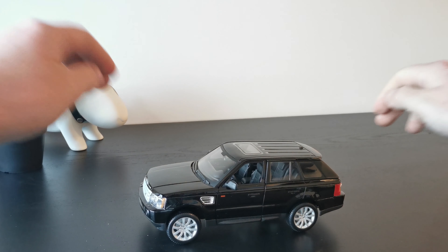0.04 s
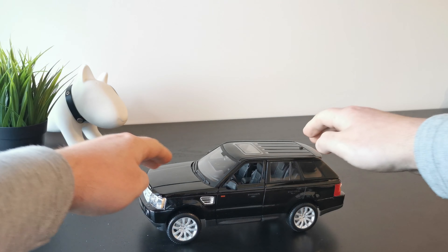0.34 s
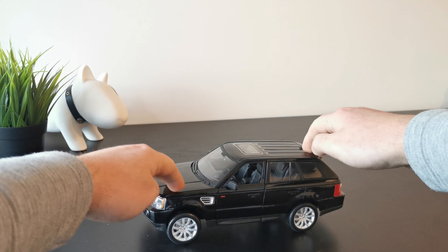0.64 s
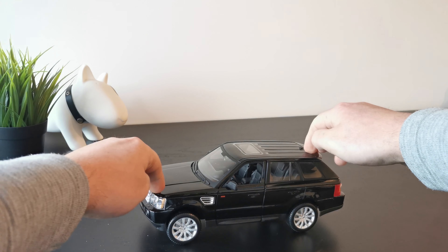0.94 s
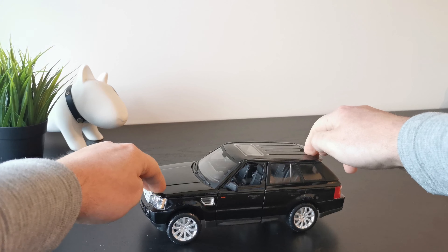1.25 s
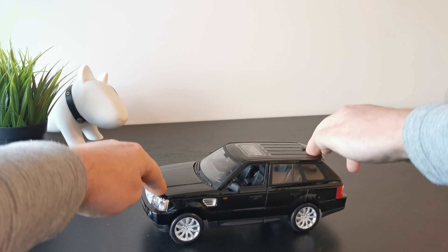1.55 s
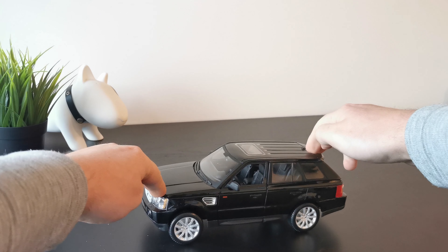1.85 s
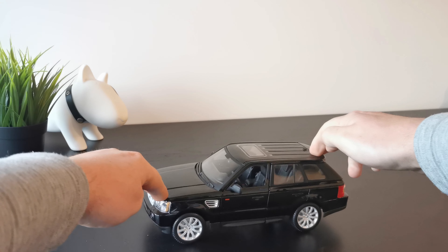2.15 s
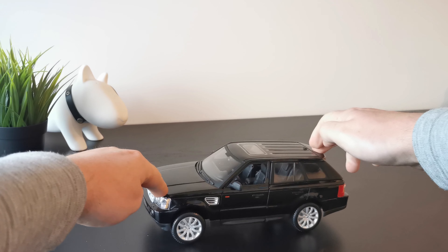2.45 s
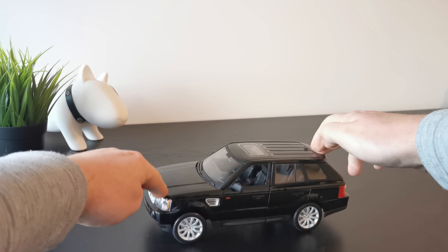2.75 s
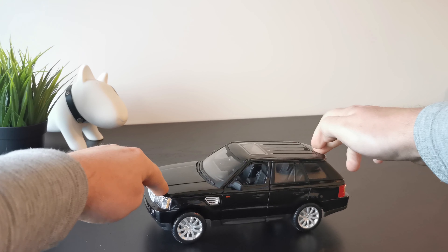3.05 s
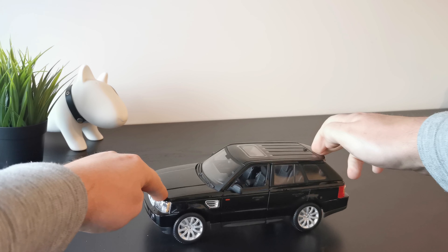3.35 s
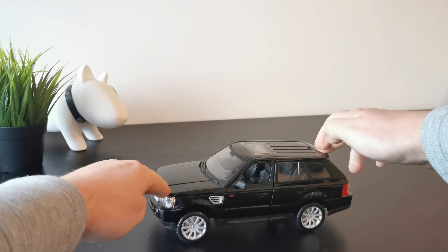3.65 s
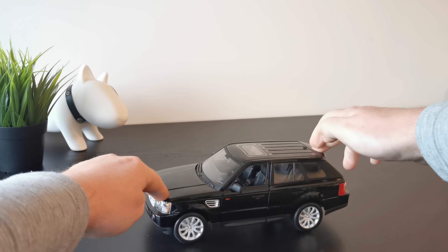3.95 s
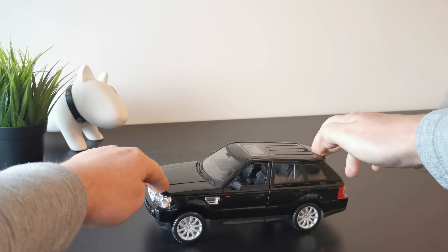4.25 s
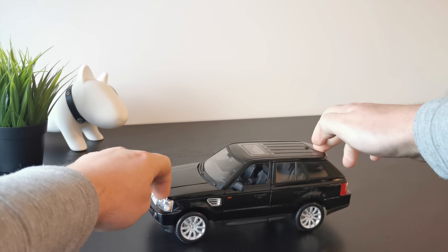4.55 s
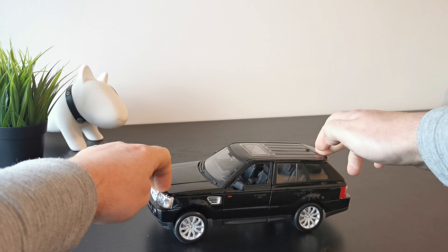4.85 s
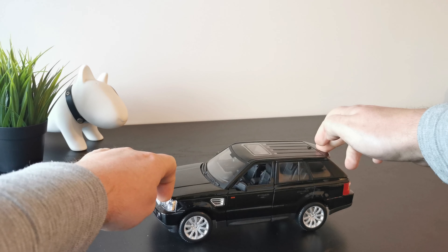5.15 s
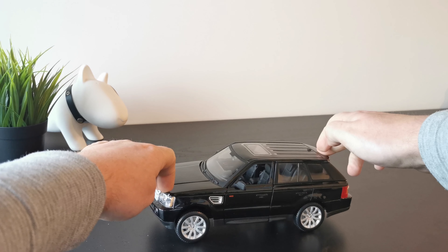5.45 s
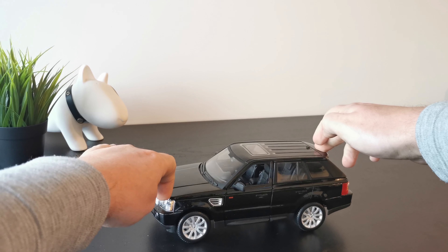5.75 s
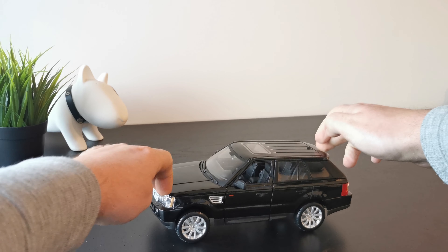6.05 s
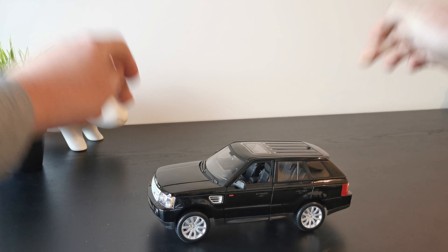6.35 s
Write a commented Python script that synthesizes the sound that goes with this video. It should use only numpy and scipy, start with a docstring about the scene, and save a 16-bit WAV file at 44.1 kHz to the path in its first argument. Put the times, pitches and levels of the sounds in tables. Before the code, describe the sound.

Two fingers rock a small metal model car on a table. After a few faint ticks, it is pushed down and let back up about eight times in a steady rhythm. Each stroke gives a light, rattly knock and a very short plastic squeak, with tiny spring ticks between. Sleeves rustle faintly as the hands leave. The sound is close, in a small, bare, quiet room.

```python
"""A die-cast model car knocks on its suspension stops as two fingers rock it on a table.
Each impact, on press and on release, excites the damped modes of the car, its shell and the table.
Stick-slip friction draws short, squeaky scrapes from the plastic struts, and the small springs tick.
Sleeves rustle as the hands come and go, the table trembles, and a small, bare room reverberates."""
import sys
import numpy as np
from scipy import signal
from scipy.fft import rfft, irfft, next_fast_len
from scipy.io import wavfile
from scipy.ndimage import uniform_filter1d

SR = 44100
rng = np.random.default_rng(int(sys.argv[2]) if len(sys.argv) > 2 else 0)


def wrap_up_sound(samples):
    """Save the sound to the file named by the first command line argument, as 16-bit audio."""
    columns = np.atleast_2d(samples).T
    # keep every value between -1 and 1, then stretch to whole-number steps
    tamed = np.clip(columns, -1, 1)
    steps = np.round(tamed * 32767).astype(np.int16)
    wavfile.write(sys.argv[1], SR, steps)


N = 290683
T = np.arange(SR // 2) / SR  # time since a contact [s]

# Levels in the tables are relative; each source applies its own gain.
# sleeve swishes: (peak time [s], level [dB], rise constant [s], fall constant [s])
SWISHES = [(.3, -80, .15, .15), (.55, -80.5, 0.12, 0.045), (3.41, -60.5, 0.074, 0.049),
           (4.56, -65.5, 0.14, .06), (5.13, -65.5, 0.025, 0.064), (6.2, -77, 0.6, 0.22),
           (6.59, -59.5, 0.23, .1)]
# spectra of cloth, table tremor and room air: (frequency [Hz], level [dB])
CLOTH_SPECTRUM = [(300, 0.5), (1000, -12.5), (2000, -7), (3300, -5), (4500, -6), (6000, -11), (8000, -15.5),
                  (11000, -20), (15500, -33)]
TREMOR_SPECTRUM = [(12, -20.5), (27, 13), (45, -26), (62, 2), (85, -6), (130, -20), (300, -9.5), (900, -65)]
AIR_SPECTRUM = [(12, -41), (20, 4.5), (85, -2), (137, -7.5), (232, -2.5), (439, -18), (614, -16),
                (932, -18.5), (1130, -27.5), (1500, -25.5), (3000, -29), (6020, -41.5), (15500, -40.5)]
# a fingertip lands, a spring or wheel settles: (time [s], level [dB], pitch [Hz], click [dB])
TICKS = [(1.133, -62.5, 2410, -72.5), (1.349, -59, 1145, -70), (1.371, -53.5, 1840, -64),
         (1.688, -46, 2260, -85), (1.858, -55.5, 2040, -65.5), (2.285, -52, 2060, -81),
         (2.451, -51.5, 2140, -69.5), (2.631, -56, 2020, -82), (3.069, -48, 2270, -70),
         (3.353, -53.5, 1820, -72), (3.556, -51, 1240, -73), (3.665, -48, 1000, -73),
         (3.718, -49.5, 1140, -82), (3.899, -41, 2300, -53), (3.973, -50, 1250, -71),
         (4.067, -45, 2890, -65), (4.081, -43, 1715, -57), (4.386, -54.5, 1000, -75),
         (4.541, -44, 2960, -56.5), (5.082, -62, 1070, -82), (5.405, -60.5, 2570, -71.5),
         (5.512, -42, 1280, -52), (5.776, -47, 2580, -82), (5.968, -49, 1455, -54.5),
         (6.24, -52.5, 2190, -67)]
# a finger pushes the car down: (time [s], thump [dB], pitch [Hz], clack [dB], click [dB],
# rebound delay [s], rebound [dB], far axle [dB], scrape delay [s], scrape [dB])
PRESSES = [(1.483, -32.5, 241, -41.5, -53.5, 0.0076, -32.5, -32.5, 0.033, -51.5),
           (2.095, -35.5, 261, -43, -51.5, 0.0088, -29, -35.5, 0.028, -54),
           (2.67, -28.5, 262, -36, -54, .013, -36, -33, 0.018, -51),
           (3.437, -27, 194, -35.5, -48.5, .011, -41.5, -35, 0.044, -59),
           (4.079, -36.5, 269, -43, -52.5, .007, -29.5, -34.5, 0.043, -47.5),
           (4.614, -33, 277, -41, -44.5, .012, -27.5, -34.5, .02, -72),
           (5.214, -28, 271, -38.5, -56, .014, -49, -45, 0.023, -62),
           (5.825, -36, 269, -40.5, -51.5, .012, -28.5, -39, 0.043, -65)]
# the car rocks back: (time [s], thump [dB], pitch [Hz], clack [dB], rebound [dB], far axle delay [s],
# far axle [dB], creep [dB], scrape delay [s], scrape [dB], scrape length [s])
RELEASES = [(1.688, -37, 209, -48, -52, 0.031, -33.5, -62, 0.075, -47, 0.0075),
            (2.284, -38, 214, -47.5, -64, 0.047, -33.5, -62, 0.083, -46, 0.0094),
            (2.853, -38, 253, -50.5, -52, 0.056, -30.5, -48, 0.092, -48.5, .014),
            (3.741, -29.5, 262, -43.5, -46, 0.043, -35, -64, 0.043, -44.5, 0.0075),
            (4.235, -38, 231, -45, -33, 0.062, -37.5, -53, .048, -44, 0.01),
            (4.844, -36, 237, -49, -56, .031, -38, -63, .029, -49.5, 0.0075),
            (5.423, -33, 230, -55, -37, .049, -40, -55.5, .051, -42, 0.0067),
            (6.057, -33, 260, -48.5, -35.5, 0.048, -37.5, -53, .056, -46, 0.0035)]
# the chassis shifts in its play between strokes: (time [s], thump [dB], pitch [Hz], clack [dB])
NUDGES = [(1.402, -45.5, 419, -51), (1.583, -37, 229, -44.5), (1.593, -38, 208, -60), (1.8, -44, 190, -53),
          (2.228, -40.5, 255, -50), (3.235, -50.5, 401, -54.5), (3.257, -45.5, 395, -48),
          (3.585, -38, 186, -49), (4.542, -37, 417, -45.5), (4.818, -40, 301, -61),
          (5.126, -52.5, 264, -55.5), (5.151, -42, 449, -56), (5.177, -33.5, 405, -44),
          (5.192, -34.5, 466, -51), (5.725, -47, 296, -53.5), (5.775, -41, 453, -52.5)]
# modes of the springs and axles, and of the metal shell: (frequency [Hz], level [dB], T60 [s])
SPRING_MODES = [(1193, -3.5, 0.09), (1340, -9, 0.12), (2091, -1, 0.034), (2150, -15, 0.021),
                (2100, -40, 0.17), (2580, -25, 0.077)]
SHELL_MODES = [(1144.5, -1, 0.12), (1411, -4, 0.084), (1655, -2, 0.015), (1800, 4.5, 0.027),
               (2102, 0, 0.039), (2220, -20, 0.037)]
# short thump modes of the car, with the longer low ringing of table and room:
# (frequency [Hz], level [dB], T60 [s])
LOW_MODES = [(80.4, -19.5, 0.58), (124, -15.5, 0.36), (141.9, -14.5, 0.37), (198.5, -9.5, 0.33),
             (230.1, 2.5, 0.042), (270, -15.5, 0.23), (299.3, -12.5, 0.2), (335, -3.5, 0.028),
             (401.9, -16.5, 0.32), (451.7, -22.5, 0.32), (634.4, -20, 0.23), (724, -16.5, 0.056),
             (826, -19, 0.13)]
# spectra of a tick's snap, trim click, shell clack and strut squeak: (frequency [Hz], level [dB])
SNAP_SPECTRUM = [(300, -19), (700, 8), (1160, 1.5), (1500, 1.5), (2200, 0.5), (3000, -0.5), (4000, -13.5),
                 (9000, -46)]
CLICK_SPECTRUM = [(500, -3), (1800, -16.5), (3200, 9.5), (4300, 14), (5150, 15.5), (5650, 1), (7000, 7.5),
                  (8500, 1), (10800, 0.5), (12500, -13.5), (15500, -22)]
CLACK_SPECTRUM = [(200, -45.5), (500, 9.5), (830, 14), (990, 4), (1160, 5), (1290, -2), (1800, 3),
                  (2250, 3), (2700, -5), (4000, -9.5), (9000, -69)]
SQUEAK_SPECTRUM = [(400, -34), (1100, -8.5), (2000, -3.5), (3000, -7), (4300, -1), (5150, -3.5),
                   (5700, -8.5), (7500, -4.5), (8500, -14), (10800, -11), (12500, -17.5), (15500, -47)]
# reverberation time: (frequency [Hz], T60 [s])
ROOM_T60 = [(100, 0.14), (260, 0.45), (700, 0.35), (1840, 0.35), (4850, 0.32), (12800, 0.28)]
# strength of the reverberant field: (frequency [Hz], level [dB])
ROOM_LEVEL = [(80, -23.5), (250, 2.5), (600, -0.5), (2000, 1), (5000, 1.5), (12000, -2.5)]
# likeness of left and right in the diffuse sound: (frequency [Hz], coherence [0 to 1])
COHERENCE = [(30, 0.71), (100, 0.48), (280, 0.98), (500, 0.58), (800, 0.12), (1160, 0.16), (2000, 0.066),
             (4000, 0.11), (12000, 0)]
# stereo balance of the car: (frequency [Hz], left minus right [dB])
BALANCE = [(60, 3.5), (92, 1), (140, -1), (210, -3), (330, -2.5), (500, -4), (770, -5.5), (1170, 1),
           (1790, -1.5), (2740, -3), (4190, -2), (6410, -10.5), (9810, 5.5), (15000, 7.5)]

CLICK_UNDER_DB = 18  # click level below the tick or clack of a light contact


def amp(db):
    """Amplitude ratio: a factor of ten for every 20 dB."""
    return 10 ** (np.asarray(db) / 20)


def unit(x):
    """Normalisation to an rms of 1."""
    return x / np.sqrt(np.mean(x ** 2) + 1e-20)


def along(points, hz):
    """Interpolation of (frequency, value) points on a logarithmic frequency axis."""
    frequencies, values = np.transpose(points)
    return np.interp(np.log(hz + 1), np.log(frequencies + 1), values)


def add(track, s, sound):
    """Superposition: a sound adds to the track from time s."""
    start = round(s * SR)
    track[..., start:start + sound.shape[-1]] += sound[..., :N - start]


def filtered(x, response):
    """Linear filtering: the spectrum is multiplied by a frequency response."""
    size = next_fast_len(N + SR // 4, True)
    return irfft(rfft(x, size) * response(np.fft.rfftfreq(size, 1 / SR)), size)[..., :N]


def coloured(x, spectrum, size=2048):
    """Minimum-phase filtering at unit energy shapes the spectrum and keeps attacks sharp."""
    cepstrum = irfft(np.log(amp(along(spectrum, np.fft.rfftfreq(size, 1 / SR)))))
    cepstrum[1:size // 2] *= 2
    cepstrum[size // 2 + 1:] = 0
    impulse = irfft(np.exp(rfft(cepstrum)))
    return signal.oaconvolve(x, impulse[None] / np.linalg.norm(impulse), axes=1)[:, :N]


def paired(x):
    """Partial coherence: two independent signals become alike in the bass, unrelated in the treble."""
    angle = lambda hz: np.arccos(np.clip(along(COHERENCE, hz), -1, 1)) / 2
    mid, side = filtered(x, lambda hz: np.array([np.cos(angle(hz)), np.sin(angle(hz))]))
    return np.array([mid + side, mid - side])


def noise(spectrum):
    """Stationary Gaussian noise of a given spectrum, in two independent channels."""
    return unit(filtered(rng.standard_normal((2, N)), lambda hz: amp(along(spectrum, hz))))


def grain(length, depth_db, rate_hz):
    """Log-normal modulation: the uneven strength of many tiny contacts."""
    return amp(depth_db * unit(uniform_filter1d(rng.standard_normal(length), SR // rate_hz)))


def sleeves(rest_db=-86):
    """Friction of cloth fibres gives a grainy noise that swells with each arm movement."""
    t = np.arange(N) / SR
    motion = amp(rest_db)
    for s, db, rise, fall in SWISHES:
        motion += amp(db) * np.exp(-np.abs(t - s) / np.where(t < s, rise, fall))
    return motion * unit(grain(N, depth_db=2, rate_hz=250) * noise(CLOTH_SPECTRUM))


def table_tremor(still_db=-79, hands_db=-63, press_db=-62, release_db=-56.5, lag_s=.08, width_s=.075):
    """Forced vibration: the table trembles under the hands and sways after each stroke."""
    t = np.arange(N) / SR
    hands_on = uniform_filter1d(1.0 * (t > 1.34) * (t < 6.55), SR // 10)
    motion = amp(still_db) + amp(hands_db) * hands_on
    for strokes, db in (PRESSES, press_db), (RELEASES, release_db):
        motion += amp(db) * sum(np.exp(-((t - s - lag_s) / width_s) ** 2) for s, *_ in strokes)
    return motion * noise(TREMOR_SPECTRUM)


def resonance(hz, t60, attack_s):
    """A damped oscillator: the one resonance that a point of contact favours."""
    return amp(-60 * T / t60) * (1 - np.exp(-T / attack_s)) * np.cos(2 * np.pi * hz * T)


def ring(modes, scatter_db, detune, attack_s):
    """Modal superposition after one blow; the point of contact changes each mode's strength."""
    hz, db, t60 = np.transpose(modes)[:, :, None]
    strength, pitch = rng.standard_normal((2, len(modes), 1))
    envelopes = amp(db + scatter_db * strength - 60 * T / t60)
    waves = envelopes * np.cos(2 * np.pi * hz * (1 + detune * pitch) * T)
    return waves.sum(0) * (1 - np.exp(-T / attack_s))


def rattle(t60, attack_s=.0006):
    """Tiny impacts of loose parts merge into a noise burst with exponential decay."""
    t = T[:SR // 10]
    envelope = amp(-60 * t / t60) * (1 - np.exp(-t / attack_s))
    impacts = unit(grain(len(t), depth_db=4, rate_hz=700))
    return rng.standard_normal((2, len(t))) * impacts * envelope


def faint_ticks(start, end, db, count, low_hz=1000, high_hz=2300, scatter_db=3):
    """A random point process of light contacts, one in each equal interval; rows as in TICKS."""
    jitter, pitch = rng.random((2, count))
    times = start + (end - start) * (np.arange(count) + jitter) / count
    levels = db + scatter_db * rng.standard_normal(count)
    return list(zip(times, levels, low_hz * (high_hz / low_hz) ** pitch, levels - CLICK_UNDER_DB))


def ticks(note_db=3, ring_db=-2, snap_db=2, click_db=6, t60=.04):
    """Impulse excitation: a touched or settling part ticks, and the springs ring behind it."""
    # fingertips feel for a hold on the bonnet
    events = TICKS + faint_ticks(.62, .93, db=-73, count=12, high_hz=1130)
    for s, *_ in PRESSES:  # the springs take the load
        events += faint_ticks(s - .06, s - .014, db=-62, count=3)
    for s, *_ in RELEASES:  # the springs settle
        events += faint_ticks(s + .11, s + .23, db=-65.5, count=2)
    pings, snaps, clicks = np.zeros(N), np.zeros((2, N)), np.zeros((2, N))
    for s, db, hz, click in events:
        note = resonance(hz, t60, attack_s=.0012)
        springs = ring(SPRING_MODES, scatter_db=3, detune=.006, attack_s=.001)
        add(pings, s, amp(db + note_db) * note + amp(db + ring_db) * springs)
        add(snaps, s, amp(db + snap_db) * rattle(t60))
        add(clicks, s, amp(click + click_db) * rattle(t60))
    return pings, coloured(snaps, SNAP_SPECTRUM) + coloured(clicks, CLICK_SPECTRUM)


def room(x, build_up_s=.0029):
    """Short diffuse reverberation: a decaying noise tail, drawn afresh for each overlapping block."""
    wet, hop = np.zeros((2, N)), SR // 3
    for start in range(0, N - hop, hop):
        part = x[start:start + 2 * hop]
        part = part * signal.windows.cosine(2 * hop)[:len(part)]
        hz, t, spectra = signal.stft(rng.standard_normal((2, len(T))), SR, nperseg=256)
        t60 = along(ROOM_T60, hz)[:, None]
        unit_energy = np.sqrt(2 * np.log(1000) / (t60 * SR))
        gain = amp(along(ROOM_LEVEL, hz))[:, None] * unit_energy
        tail = signal.istft(spectra * gain * amp(-60 * t / t60), SR, nperseg=256)[1][:, :len(T)]
        tail *= 1 - np.exp(-T / build_up_s)
        add(wet, start / SR, signal.fftconvolve(part[None], tail, axes=1))
    return wet


def rebound(s, thump, hz, pitch_ratio=.952):
    """Repeated impact: a second, slightly lower knock about 10 ms after the first, louder or softer."""
    return s, thump, hz * pitch_ratio, thump - 11.5, thump - 32.5


def contacts(bounce_s=.024, far_axle_s=.045, release_rebound_s=.012):
    """Collisions with the stops: (time [s], thump [dB], pitch [Hz], clack [dB], click [dB])."""
    for s, thump, hz, clack, click, rebound_s, rebound_db, axle_db, *_ in PRESSES:
        yield s, thump, hz, clack, click  # the near axle strikes first
        yield rebound(s + rebound_s, rebound_db, hz)
        yield s + bounce_s, thump - 15.5, hz, -58.5, -58.5 - CLICK_UNDER_DB  # last, cushioned bounce
        yield s + far_axle_s, axle_db, hz, -56.5, -60  # the far axle lands on its springs
    for s, thump, hz, clack, rebound_db, axle_s, axle_db, *_ in RELEASES:
        yield s, thump, hz, clack, clack - CLICK_UNDER_DB
        yield rebound(s + release_rebound_s, rebound_db, hz)
        yield s + axle_s, axle_db, hz, -44, -56  # the far axle snaps against its upper stop
    for s, thump, hz, clack in NUDGES:
        yield s, thump, hz, clack, clack - CLICK_UNDER_DB


def knocks(thump_db=3, low_ring_db=2, clack_db=3, shell_db=-4, click_db=7, t60=.07, low_cut_hz=110):
    """Impact excitation: each collision thumps the table, clacks the shell and clicks the trim."""
    thumps, rings, clacks, clicks = np.zeros(N), np.zeros(N), np.zeros((2, N)), np.zeros((2, N))
    for s, thump, hz, clack, click in contacts():
        low_ring = ring(LOW_MODES, scatter_db=2.5, detune=.015, attack_s=.0012)
        shell = ring(SHELL_MODES, scatter_db=3, detune=.025, attack_s=.0005)
        add(thumps, s, amp(thump + thump_db) * resonance(hz, t60, attack_s=.0009))
        add(rings, s, amp(thump + low_ring_db) * low_ring + amp(clack + shell_db) * shell)
        add(clacks, s, amp(clack + clack_db) * rattle(t60))
        add(clicks, s, amp(click + click_db) * rattle(t60))
    # so small a body radiates little deep bass
    thumps = signal.sosfilt(signal.butter(2, low_cut_hz, "high", fs=SR, output="sos"), thumps)
    return thumps + rings, coloured(clacks, CLACK_SPECTRUM) + coloured(clicks, CLICK_SPECTRUM)


def strut_slides(press_length_s=.015, creep_lead_s=.02, creep_length_s=.014):
    """Sliding friction in each stroke, with creep first on release: (time [s], level [dB], length [s])."""
    for s, *_, delay, db in PRESSES:
        yield s + delay, db, press_length_s
    for s, *_, creep_db, delay, db, length in RELEASES:
        yield s + delay - creep_lead_s, creep_db, creep_length_s
        yield s + delay, db, length


def scrapes(slip_hz=600, unevenness=.4, count=28, slip_t60=.007):
    """Stick-slip friction: a strut moves in a quick, uneven run of slips that swells and fades."""
    slips = np.zeros((2, N))
    decay = amp(6 - 60 * T[:SR // 200] / slip_t60)
    for s, db, length in strut_slides():
        gap, size = rng.standard_normal((2, count))
        delays = np.cumsum(np.exp(unevenness * gap)) / slip_hz
        progress = 3 * delays / length  # the swell peaks at a third of the length
        gains = amp(db + 3 * size) * progress * np.exp(1 - progress)
        for delay, gain in zip(delays - delays[0], gains):
            add(slips, s + delay, gain * decay * rng.standard_normal((2, len(decay))))
    return coloured(slips, SQUEAK_SPECTRUM)


def scene(tick_room_db=-3, lean_db=1, air_db=-66):
    """Direct and diffuse fields add: ringing parts near the centre, chatter and room around them."""
    thumps, chatter = knocks()
    pings, ticking = ticks()
    chatter = chatter + scrapes()
    # the small ticking parts face the listener and send less into the room
    reverberation = room(thumps + chatter[0] + amp(tick_room_db) * (pings + ticking[0]))
    car = thumps + pings + paired(chatter + ticking + reverberation)
    car = filtered(car, lambda hz: amp(np.outer([.5, -.5], along(BALANCE, hz))))
    # the pressure shifts slowly from the tail on the right to the nose on the left
    drift = amp(lean_db * np.outer([1, -1], np.linspace(-1, 1, N)))
    background = sleeves() + amp(air_db) * noise(AIR_SPECTRUM) + table_tremor()
    return car * drift + paired(background)


def record(dry, top_hz=15750):
    """Band limiting: an ideal low-pass filter removes the highest treble."""
    return filtered(dry, lambda hz: hz < top_hz)


dry = scene()
out = record(dry)
wrap_up_sound(out)
```